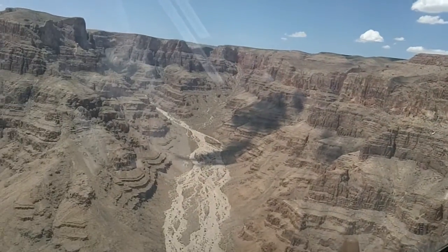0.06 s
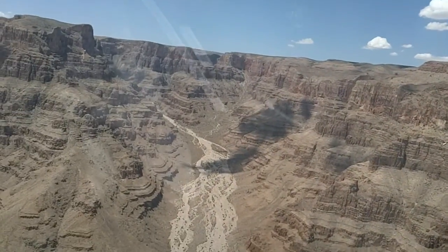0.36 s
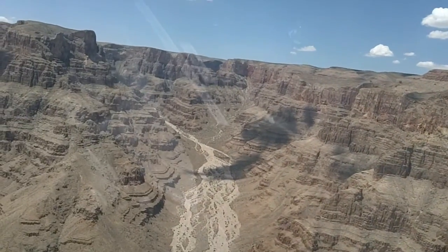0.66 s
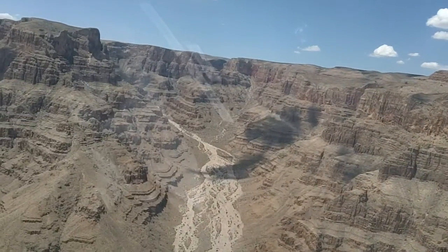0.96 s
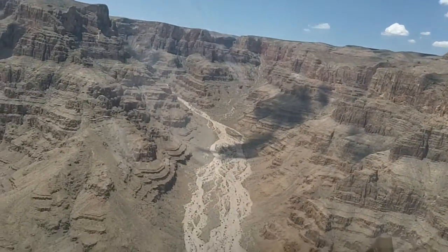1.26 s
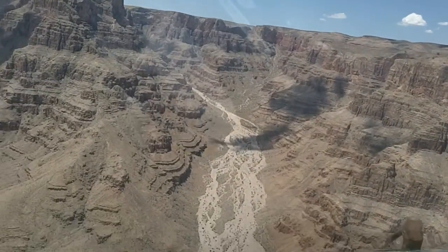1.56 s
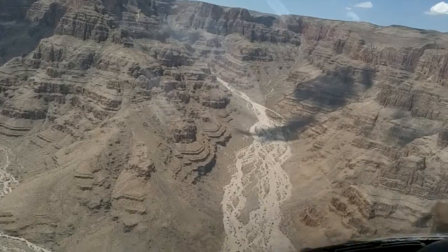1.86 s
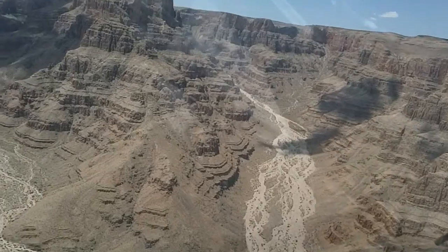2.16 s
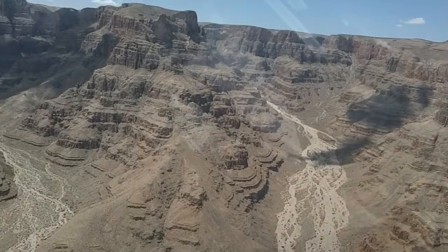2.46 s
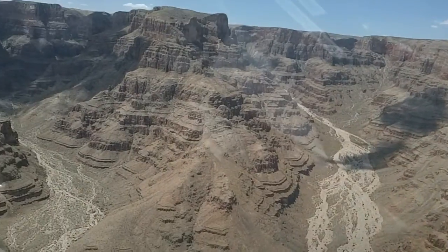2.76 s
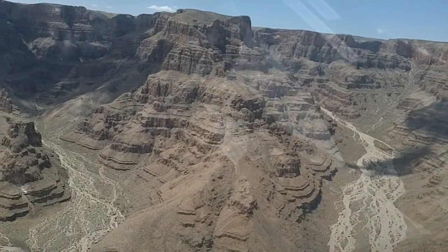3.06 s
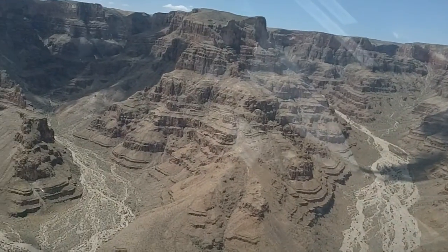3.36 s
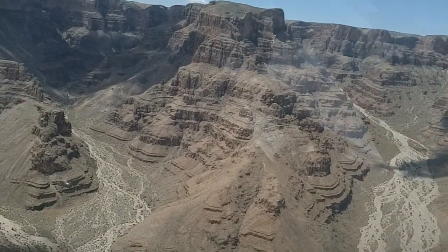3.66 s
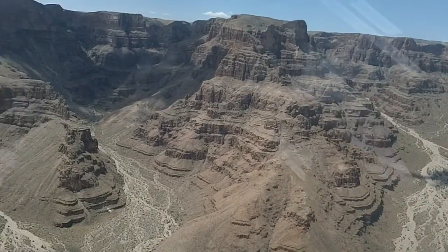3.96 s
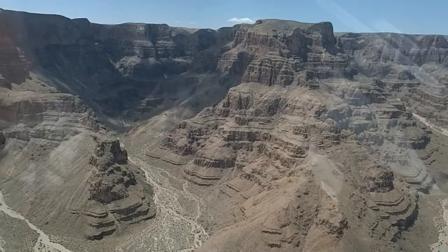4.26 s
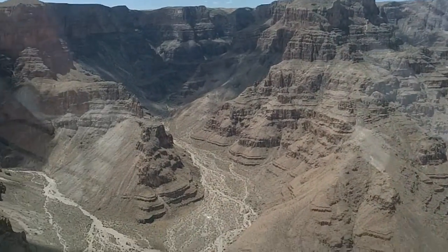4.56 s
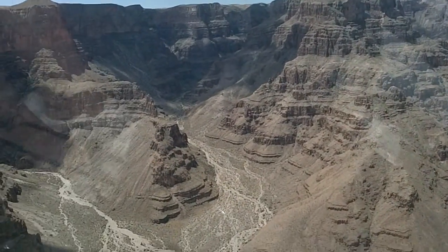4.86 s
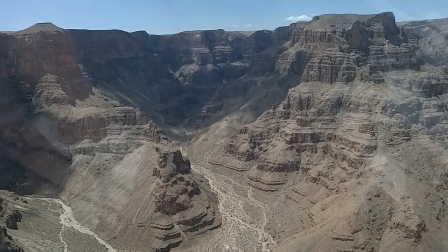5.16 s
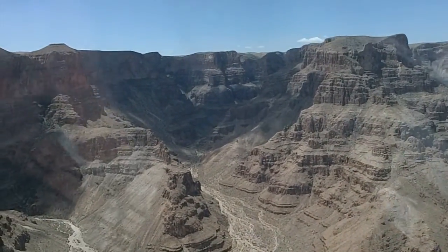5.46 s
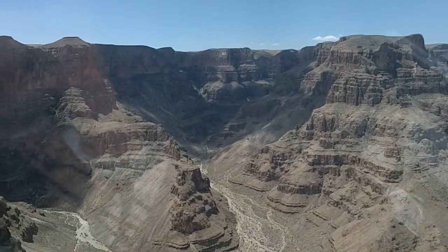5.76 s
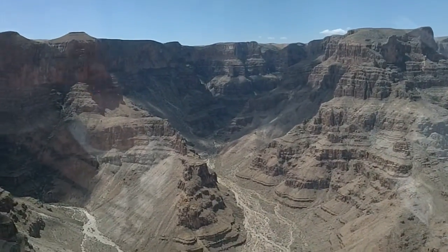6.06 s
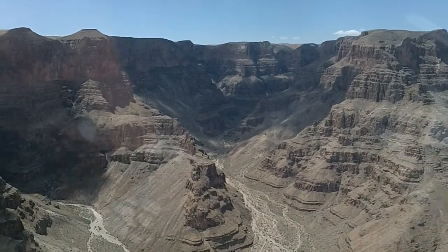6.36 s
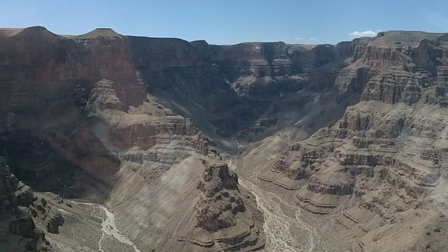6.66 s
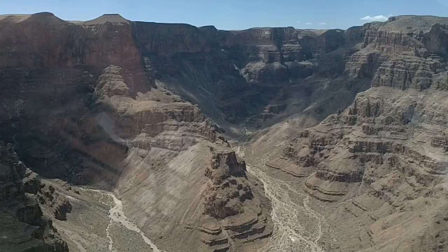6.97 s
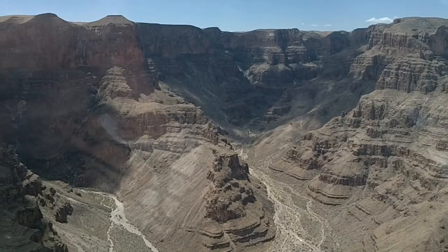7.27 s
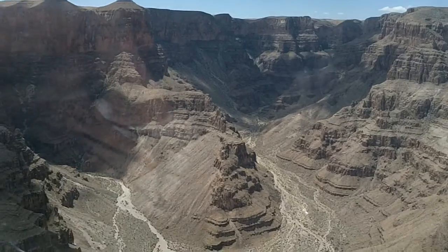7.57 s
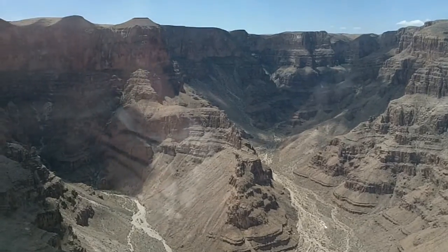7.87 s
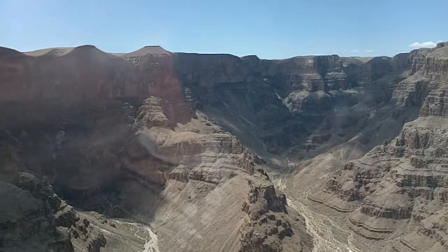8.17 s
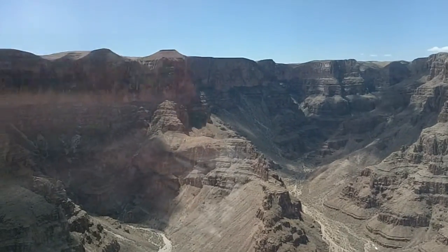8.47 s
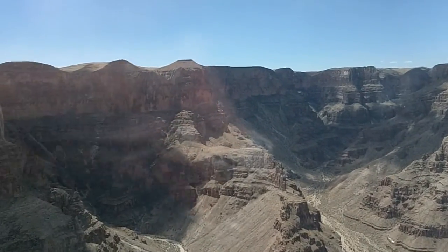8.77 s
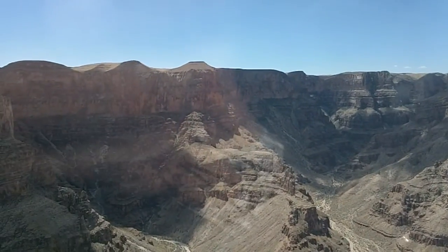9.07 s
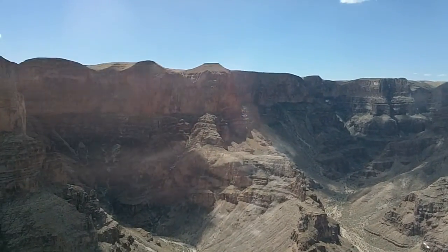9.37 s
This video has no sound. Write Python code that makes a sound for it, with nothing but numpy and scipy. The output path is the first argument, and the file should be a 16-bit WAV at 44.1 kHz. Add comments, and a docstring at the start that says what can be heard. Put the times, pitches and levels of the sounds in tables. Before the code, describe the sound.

Inside a flying helicopter, a deep rotor throb pulses under a steady buzz, rushing air and a thin gear whine.

```python
"""Inside the cabin of a helicopter in steady flight.
Three main blades pump the cabin air into a deep throb, under the buzz of the tail rotor and the
engine's hum. Meshing gears sing thin tones that swell in a turn. Air roars, hisses and whistles along
the canopy, with a few sharp gusts; the microphone fizzes on the strongest pressure peaks."""
import sys
import numpy as np
from scipy import signal
from scipy.fft import rfft, irfft
from scipy.io import wavfile

SR = 44100
rng = np.random.default_rng(int(sys.argv[2]) if len(sys.argv) > 2 else 0)


def generate_wav(sig):
    """Save sig (samples, or channels by samples) to the path in sys.argv[1] as 16-bit PCM at SR."""
    pcm = np.round(np.clip(np.atleast_2d(sig).T, -1, 1) * 32767).astype(np.int16)
    wavfile.write(sys.argv[1], SR, pcm)


N = 420273
TIME = np.arange(N) / SR
FREQS = np.fft.rfftfreq(N, 1 / SR)
# cycles per turn of the main rotor
BLADES, TAIL, ENGINE, PLANETARY, BEVEL, PUMP = 3, 10.6, 15.55, 100, 264.31, 303.26


def gain_of(db):
    return 10 ** (np.asarray(db) / 20)


def unit_power(x):
    return x / np.sqrt(np.mean(abs(x) ** 2) + 1e-20)


def curves(rows):
    """One envelope per column after the first (t/s), in straight ramps."""
    times, *columns = np.transpose(rows)
    return [np.interp(TIME, times, column) for column in columns]


def noise(spectrum):
    """Noise of unit power, coloured by rows of f/Hz, relative level/dB."""
    hz, db = np.transpose(spectrum)
    shape = gain_of(np.interp(np.log(FREQS + 1e-3), np.log(hz), db, left=-100, right=-100))
    return unit_power(irfft(rfft(rng.standard_normal(N)) * shape, N))


def drift(rate_hz):
    """Random wandering of unit power, about as fast as the rate."""
    frames = N // 64
    hz = np.fft.rfftfreq(frames, TIME[-1] / frames)
    slow = irfft(rfft(rng.standard_normal(frames)) / (1 + (hz / rate_hz) ** 2), frames)
    return unit_power(np.interp(TIME, np.linspace(0, TIME[-1], frames), slow))


def tone(angle, rough, rate_hz):
    """A tone of unit power; the share `rough` wavers in strength and phase."""
    carrier = np.exp(1j * (angle + 2 * np.pi * rng.random()))
    waver = drift(rate_hz) + 1j * drift(rate_hz)
    return unit_power((carrier * (1 + rough * waver)).real)


def harmonics(angle, levels_db, rough, rate_hz):
    """The wavering harmonics of one turning part."""
    return sum(gain_of(db) * tone(k * angle, rough, rate_hz) for k, db in enumerate(levels_db, 1))


def seal_whistles():
    """Breathy whistles at the canopy seals trade strength as the air meets them from a new side."""
    # resonances: f/Hz, width/Hz, level on the first heading/dB, level on the second/dB
    resonances = [(2213, 29, -58, -62), (3225, 47, -52.5, -78), (3480, 85, -89, -50.5),
                  (3787, 49, -53.5, -53.5), (3934, 69, -65, -53.5), (4110, 130, -59, -53.5),
                  (4524, 62, -55, -59)]
    # the nose swings from the first heading to the second: t/s, share of the way/0-1
    nose_swing = [(0, 0.3), (.8, 0), (1.5, 0), (2.2, 0.24), (3.3, .4), (4.5, 1), (7.4, 0.88), (9.5, 0.74)]
    swing, = curves(nose_swing)
    whistles = np.zeros(N)
    for hz, width, first_db, second_db in resonances:
        band = irfft(rfft(rng.standard_normal(N)) / (1 + ((FREQS - hz) / width * 1.34) ** 2), N)
        whistles += gain_of(first_db + swing * (second_db - first_db)) * unit_power(band)
    return whistles


def airflow(angle):
    """Turbulent air on the cabin, chopped by the blade wakes and shaken by shared eddies and gusts."""
    # fader rides of the rushing air: t/s, roar level/dB, hiss level/dB
    air_levels = [(0, -39, -43.5), (.9, -36.5, -42), (1.8, -38.5, -44), (3.6, -38, -44), (4.6, -37.5, -44),
                  (5.7, -35.5, -42.5), (6.4, -37, -44.5), (7.2, -36, -43.5), (8.7, -36, -44),
                  (9.53, -38, -45)]
    # gusts striking the cabin: t/s, half length/s, lift of the rush/dB, lift of the rumble/dB
    gusts = [(1.295, 0.021, 2.5, -4), (2.164, 0.034, 4, 6), (3.952, 0.038, 2.5, 11.5),
             (4.304, 0.047, 4.5, 3.5), (4.785, 0.026, 5, -2), (5.52, 0.11, 1.5, 1.5), (6.253, 0.03, 3.5, 6),
             (7.14, 0.05, 3, 0), (7.335, .05, 2, 1), (7.764, 0.04, 3, -2), (8.432, 0.041, 4.5, 6),
             (9.106, 0.058, 2, -1.5)]
    # colours of the air's three layers: f/Hz, relative level/dB
    rumble_spectrum = [(3, -33), (8, -10), (40, 4.5), (70, 0), (100, -3.5), (128, -2.5), (155, -9),
                       (205, -8.5), (250, -13), (330, -26.5), (600, -40)]
    roar_spectrum = [(100, -46), (220, 0.5), (290, 0), (420, -0.5), (570, -1), (800, -5.5), (1100, -10),
                     (1600, -12), (2200, -14), (2700, -23), (3600, -45)]
    hiss_spectrum = [(1500, -26), (2500, -6), (3300, 0.5), (3900, -2.5), (4600, -1.5), (5200, -5),
                     (5900, -8), (6500, -9.5), (7300, -18.5), (8300, -24.5), (9600, -23.5), (11500, -28),
                     (15000, -30)]
    roar_db, hiss_db = curves(air_levels)
    wake = BLADES * angle
    # the rush pulses within each blade passage, and sways once a turn
    chop = np.cos(2 * (wake + .2)) + .8 * np.cos(3 * (wake + .42)) + .7 * np.cos(angle + .9)
    eddies = drift(rate_hz=37)
    rush_db = 0.53 * drift(rate_hz=10)  # light flutter between gusts
    buffet_db = 0.25 * (roar_db - roar_db.mean())  # the rumble rises with the roar
    for centre, half_length, air_db, rumble_db in gusts:
        swell = np.exp(-((TIME - centre) / half_length) ** 2)
        rush_db += air_db * swell
        buffet_db += rumble_db * swell
    rumble = gain_of(-26.0 + 1.36 * eddies + buffet_db) * noise(rumble_spectrum)
    roar = gain_of(roar_db + 1.7 + rush_db + 0.56 * chop + 1.55 * eddies) * noise(roar_spectrum)
    hiss_gain = gain_of(hiss_db + 0.98 * rush_db + 0.55 * chop + 1.35 * eddies)
    # the whistles follow only the hiss's movement about its mean level
    hiss = noise(hiss_spectrum) + gain_of(-hiss_db.mean()) * seal_whistles()
    return rumble + roar + hiss_gain * hiss


def gearbox(angle):
    """Meshing teeth sing; under load the planets surge once an orbit and add a grinding haze."""
    # bevel gear whine, rising with the load in the turn: t/s, level/dB
    whine_levels = [(0, -58), (.7, -50), (2.5, -53), (3.2, -47), (4.1, -47), (4.7, -41.5), (7.7, -40.5),
                    (9.0, -41.5), (9.53, -44.5)]
    # strongest planetary gear tone: t/s, level/dB
    planet_levels = [(0, -51.5), (1.4, -52), (2.0, -46), (4.0, -49), (5.3, -44.5), (6.3, -45.5), (6.8, -50),
                     (7.7, -51.5), (8.4, -60), (9.53, -54)]
    # its fainter companions: multiple of the planetary mesh rate, level/dB
    mesh_lines = [(1, -54), (3, -61), (4, -63), (5, -64), (8, -65)]
    # colour of the grinding haze: f/Hz, relative level/dB
    grind_spectrum = [(800, -27), (1080, 5), (1200, 17), (1330, 9.5), (1480, -4.5), (1700, 15.5),
                      (1900, -0.5), (2600, -29)]
    whine_db, = curves(whine_levels)
    planet_db, = curves(planet_levels)
    load = gain_of(whine_db)
    whine = tone(BEVEL * angle, rough=.12, rate_hz=12)
    mesh = PLANETARY * angle
    surge = gain_of(-10.5) * load * np.cos(angle - 2.3)
    planets = (gain_of(planet_db) + surge) * tone(2 * mesh, rough=0.13, rate_hz=3.5)
    companions = sum(gain_of(db) * tone(k * mesh, rough=0.073, rate_hz=14.0) for k, db in mesh_lines)
    pump = gain_of(-60) * tone(PUMP * angle, rough=0.22, rate_hz=4)
    grind = gain_of(-6.0) * noise(grind_spectrum)
    return load * (whine + grind) + planets + companions + pump


def engine(angle):
    """The engine's output shaft gives a low hum."""
    # shaft harmonics 1, 2: level/dB
    hum_db = [-35.5, -59]
    return harmonics(ENGINE * angle, hum_db, rough=0.08, rate_hz=1.4)


def tail_rotor(angle):
    """The tail rotor buzzes, its lowest note swelling and sinking with the thrust."""
    # buzz harmonics 1, 2, 3...: level/dB
    buzz_db = [-28, -34.5, -38.5, -77, -56, -69]
    lowest_db, *upper_db = buzz_db
    thrust_db = 1.5 * drift(rate_hz=1.9)
    return harmonics(TAIL * angle, [lowest_db + thrust_db, *upper_db], rough=0.098, rate_hz=2.4)


def main_rotor(angle):
    """Each passing blade gives one rounded push; slight imbalance rocks the cabin once a turn."""
    # blade-pass harmonics 1, 2, 3...: level/dB
    throb_db = [-17.5, -26, -54, -41.5]
    pushes = sum(gain_of(db) * np.cos(k * BLADES * angle) for k, db in enumerate(throb_db, 1))
    throb = np.sqrt(2) * pushes * (1 + 0.047 * drift(rate_hz=0.93))
    imbalance = gain_of(-40) * tone(angle, rough=0.26, rate_hz=1.6)
    return throb + imbalance


def scene():
    """One rotor angle drives every geared part and the chop in the airflow."""
    # main rotor turn rate, held nearly constant by the governor: t/s, f/Hz
    rotor_speed = [(0, 6.5299), (1.0, 6.5096), (1.6, 6.507), (2.5, 6.5311), (4.5, 6.5078), (7.0, 6.5085),
                   (9.53, 6.5325)]
    rotor_hz, = curves(rotor_speed)
    start_turn = .06
    angle = 2 * np.pi * (np.cumsum(rotor_hz) / SR + start_turn)
    cabin = main_rotor(angle) + tail_rotor(angle) + engine(angle) + gearbox(angle) + airflow(angle)
    return cabin[None]


def microphone_fizz(pressure):
    """Pressure peaks of either sign strain the microphone into a short fizz."""
    # colour of the fizz: f/Hz, relative level/dB
    fizz_spectrum = [(3000, 7), (8400, -5), (9600, 5.5), (10600, -8), (12000, 4.5), (13100, -8), (14500, 4),
                     (15400, -4)]
    knee, knee_width = 0.24, 0.085  # shares of full scale
    decay_s, fizz_db = 0.0028, -47
    strain = np.tanh(np.maximum(abs(pressure) - knee, 0) / knee_width)
    pole = np.exp(-1 / (decay_s * SR))
    settled = signal.lfilter([1 - pole], [1, -pole], strain)
    attack = np.maximum(strain - settled, 0)
    return gain_of(fizz_db) * attack * noise(fizz_spectrum)


def record(dry):
    """The microphone adds its fizz; the treble has narrow notches and a steep top edge."""
    # gaps in the treble: f/Hz, half width/Hz
    notches = [(2715, 270), (5500, 335), (7870, 740), (10930, 290)]
    edge_hz = 15350
    sound = (dry + microphone_fizz(dry)) * signal.windows.tukey(N, .001)  # click-free ends
    colour = np.prod([abs(FREQS - hz) / np.hypot(FREQS - hz, width) for hz, width in notches], axis=0)
    notched = irfft(rfft(sound) * colour, N)
    lowpass = signal.firwin(1023, edge_hz, window=("kaiser", 9), fs=SR)
    return signal.oaconvolve(notched, lowpass[None], "same")


dry = scene()
out = record(dry)
generate_wav(out)
```